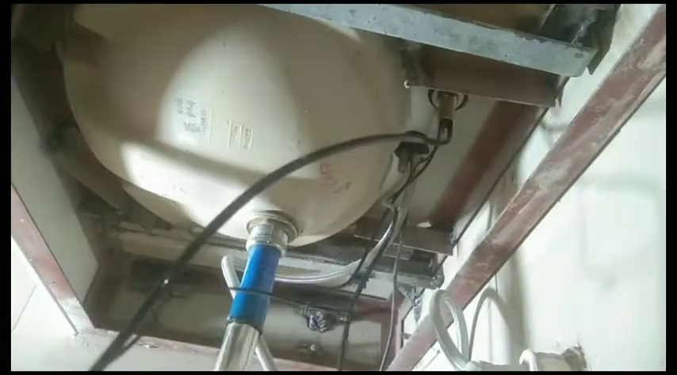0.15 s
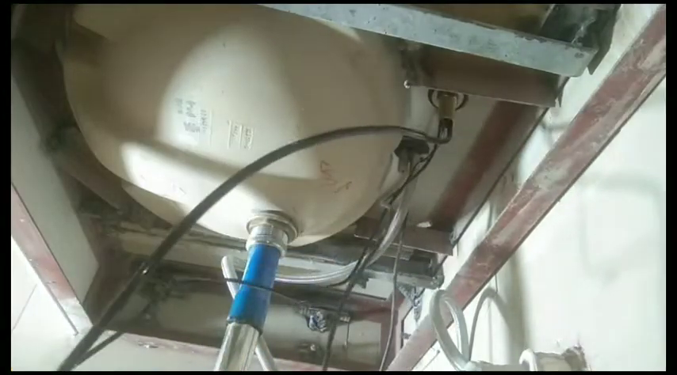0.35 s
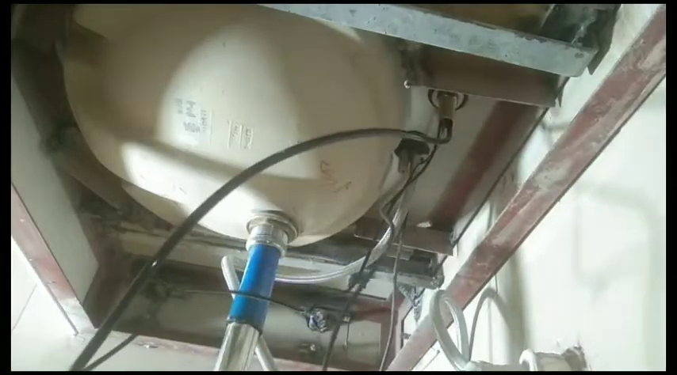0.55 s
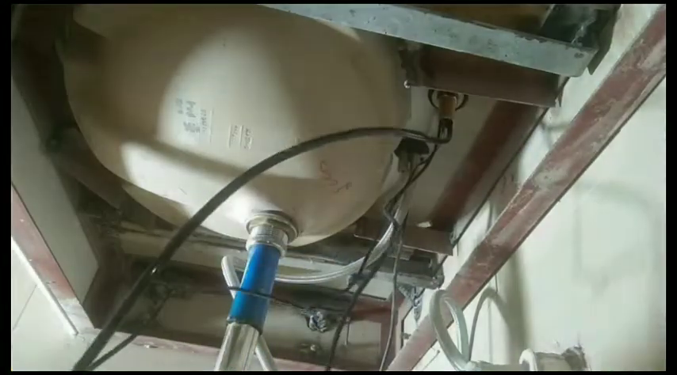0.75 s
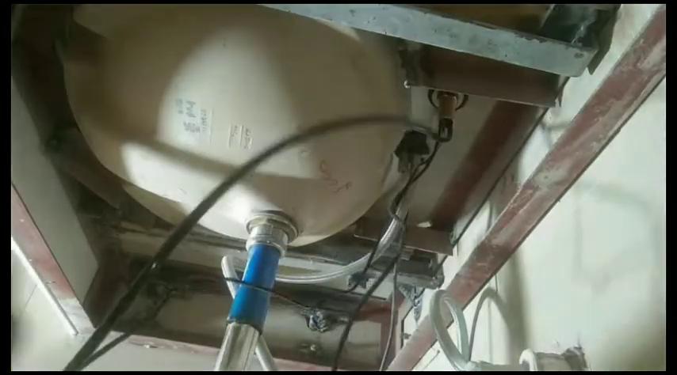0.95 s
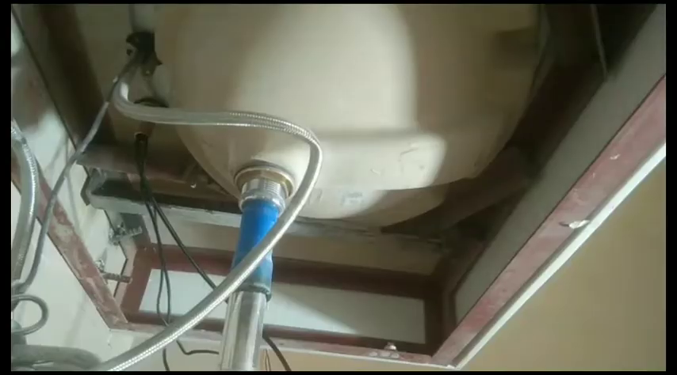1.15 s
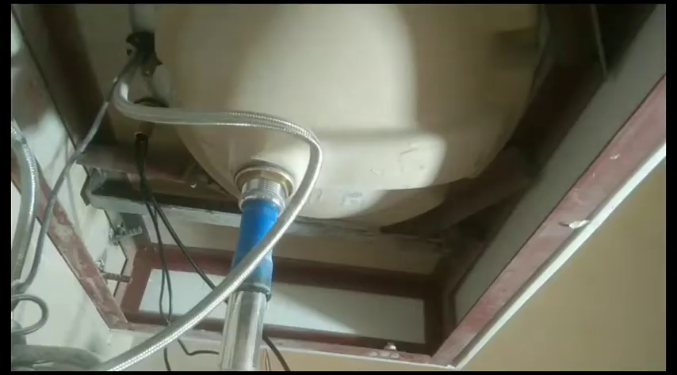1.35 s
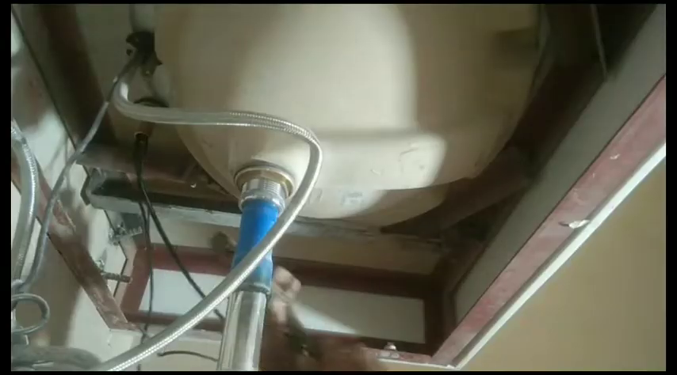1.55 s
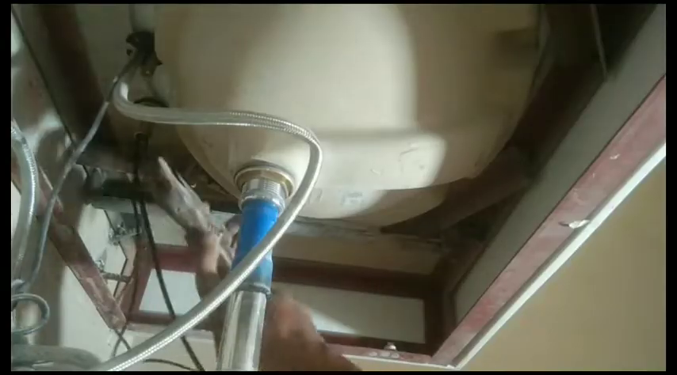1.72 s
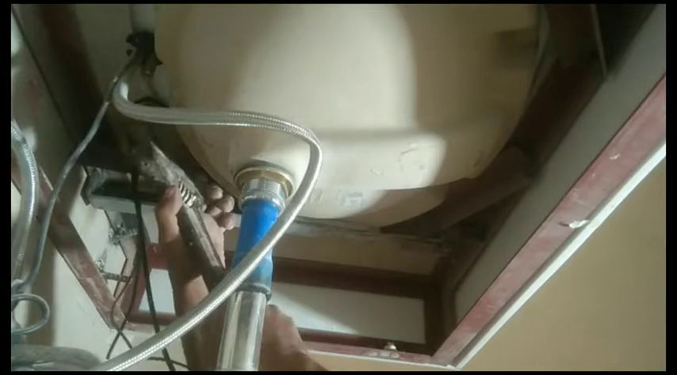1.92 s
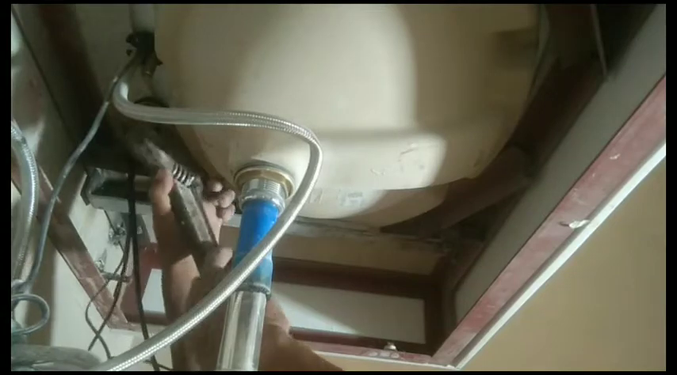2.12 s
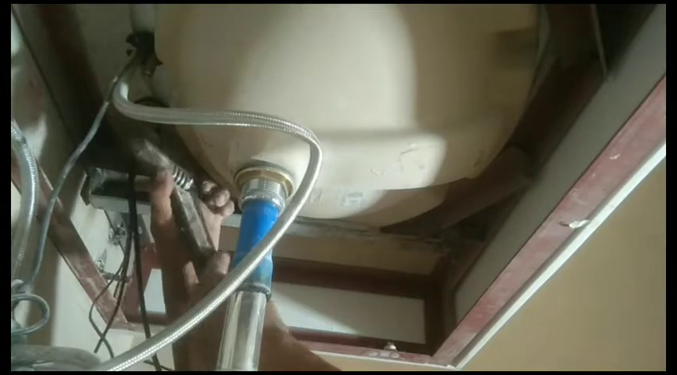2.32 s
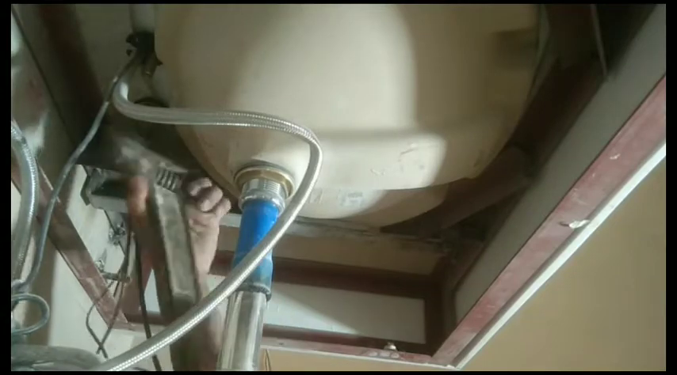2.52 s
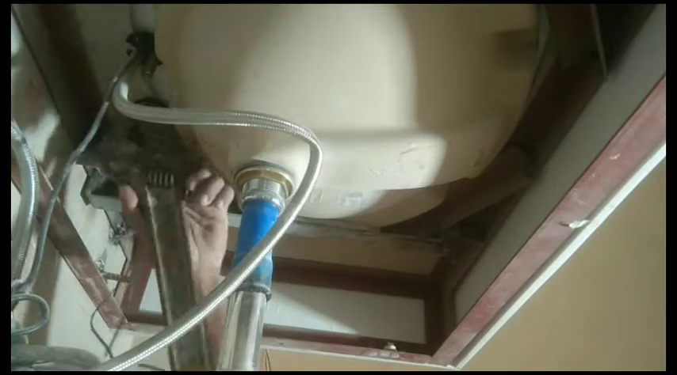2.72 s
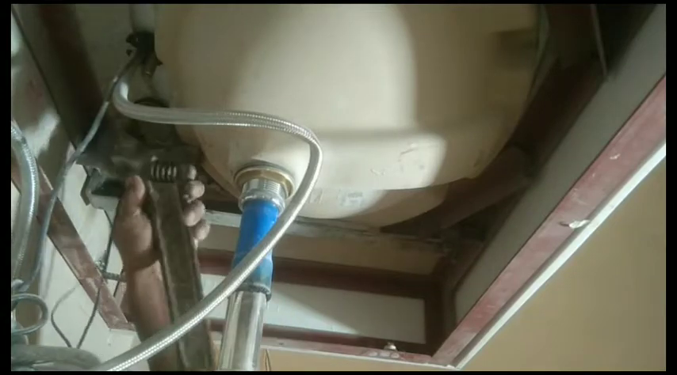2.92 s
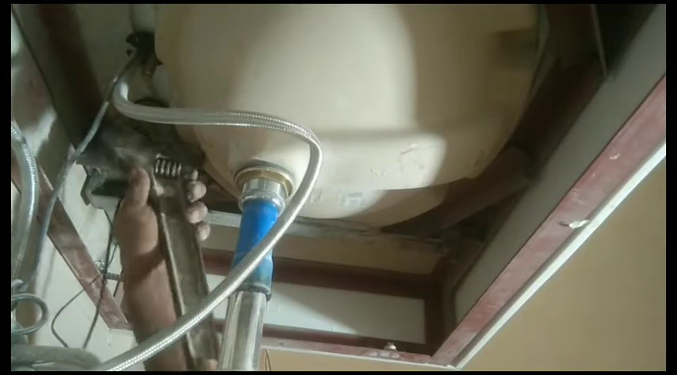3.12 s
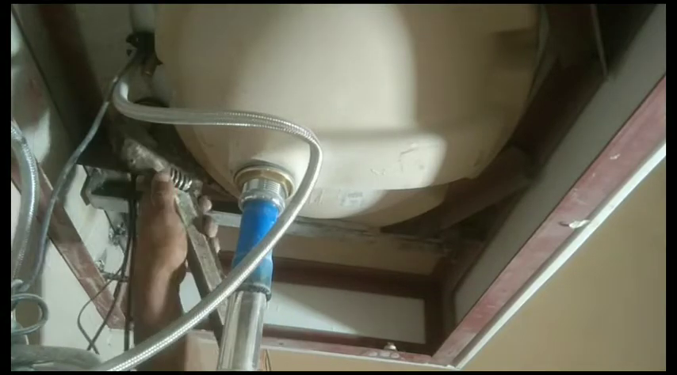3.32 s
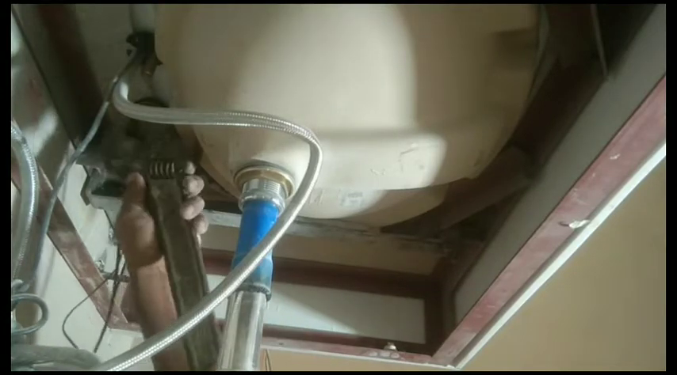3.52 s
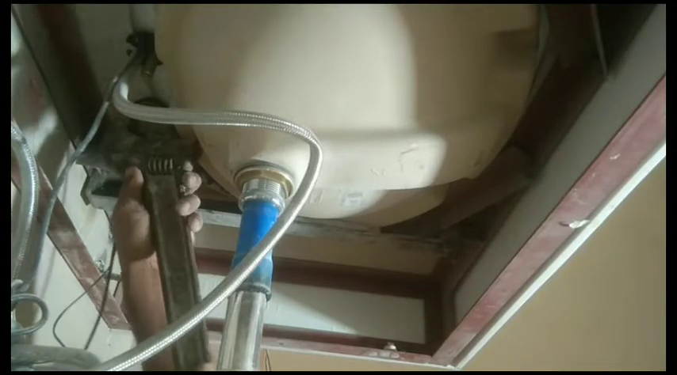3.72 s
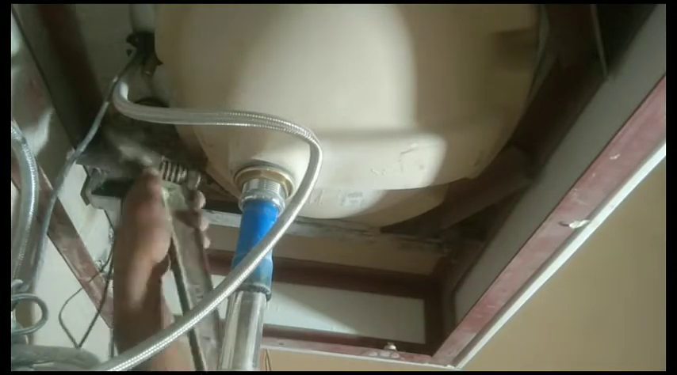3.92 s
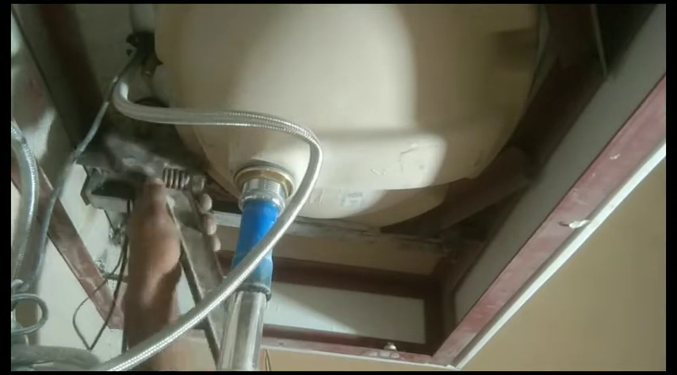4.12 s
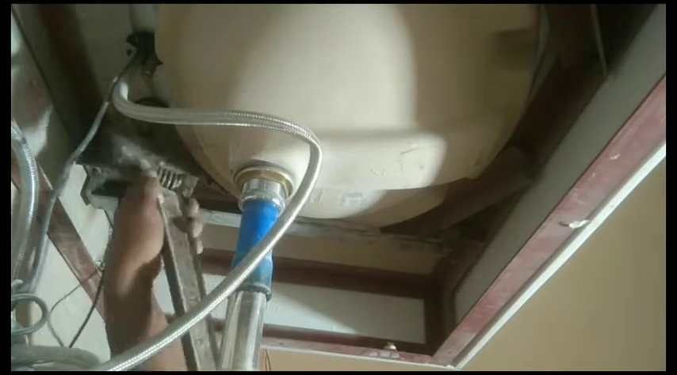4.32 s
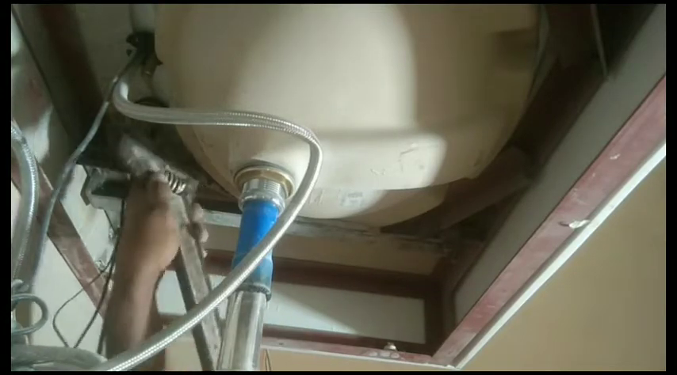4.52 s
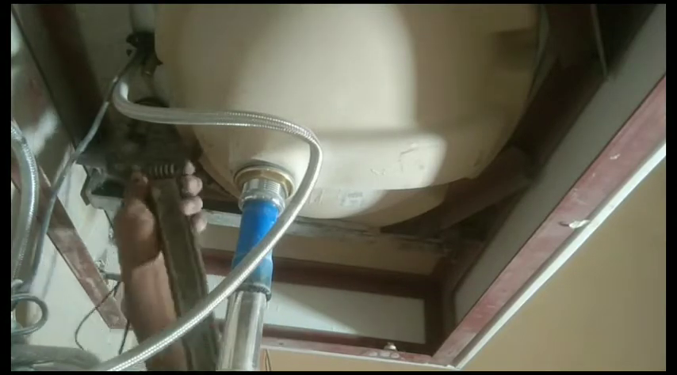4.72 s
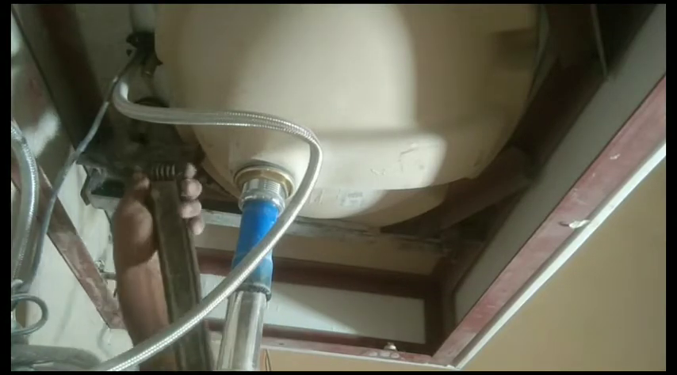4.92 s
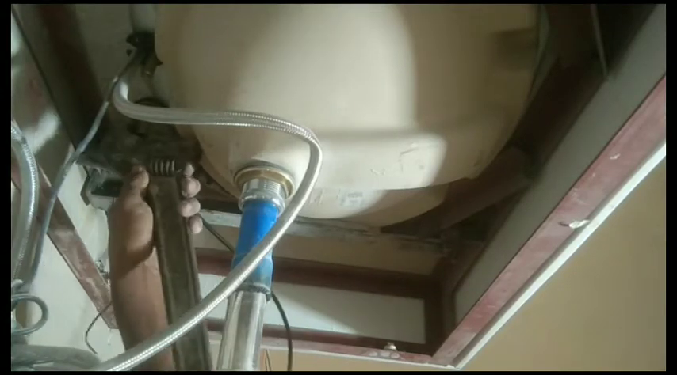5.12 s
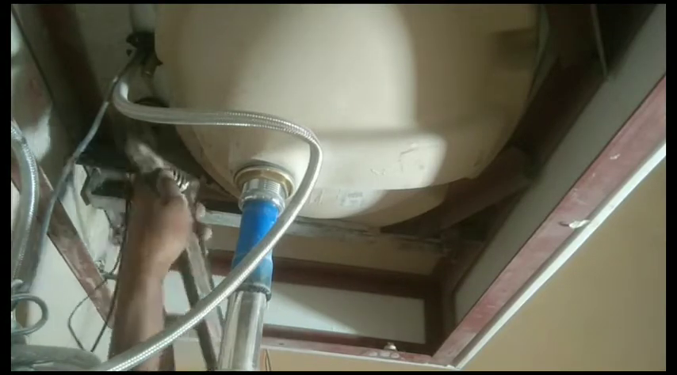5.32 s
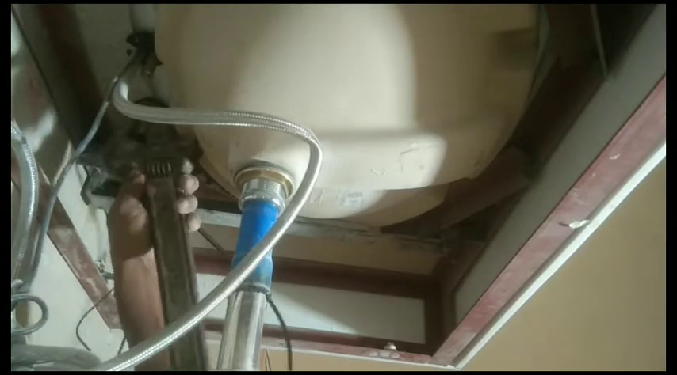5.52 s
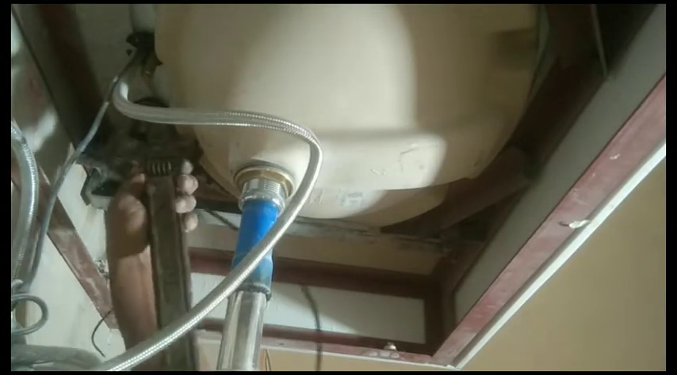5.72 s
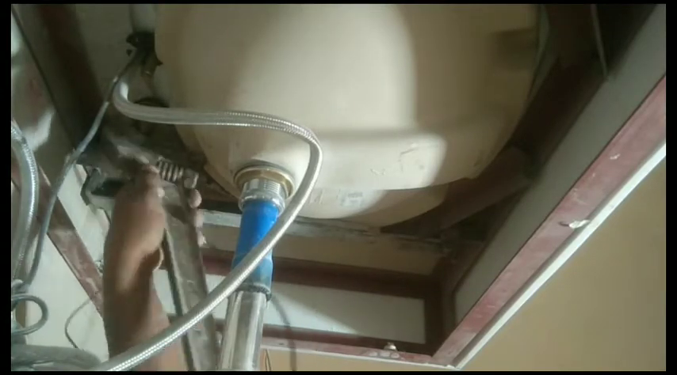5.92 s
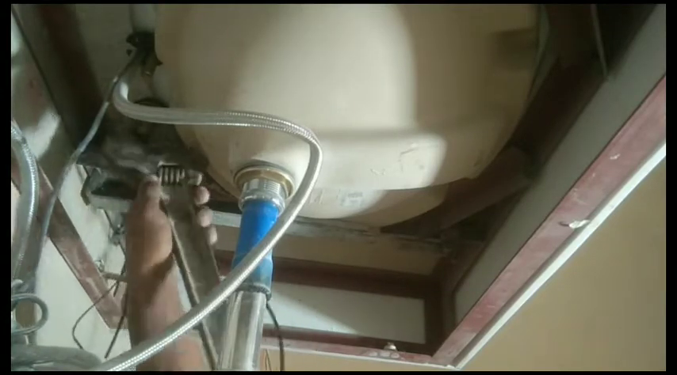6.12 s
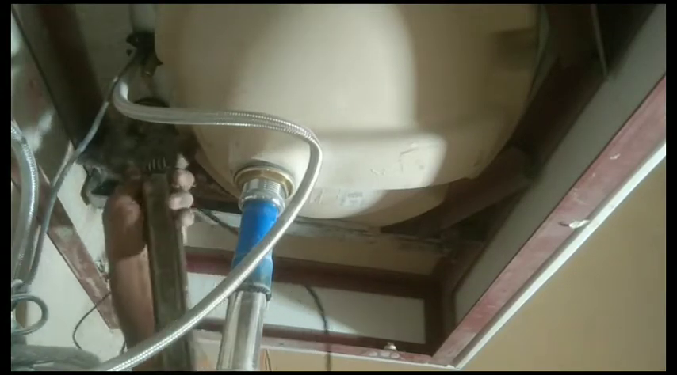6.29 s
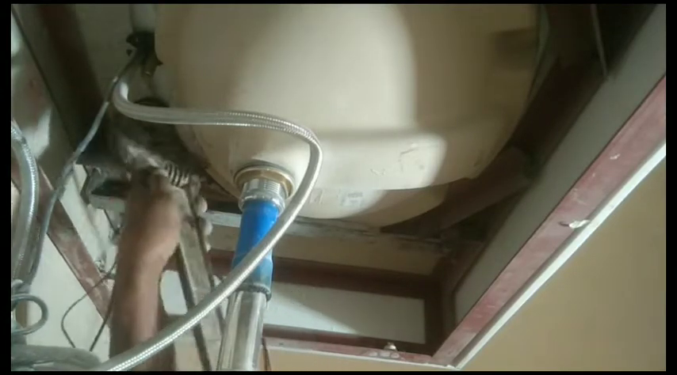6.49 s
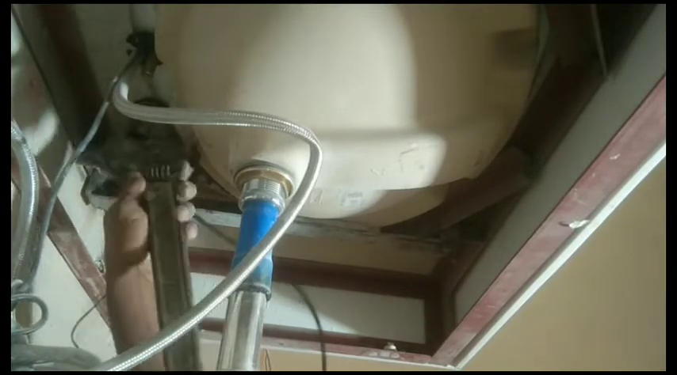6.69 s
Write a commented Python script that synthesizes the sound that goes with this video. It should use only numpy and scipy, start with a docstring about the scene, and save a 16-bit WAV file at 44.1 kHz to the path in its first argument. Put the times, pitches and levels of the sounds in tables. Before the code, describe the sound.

A stiff valve gives a brief, high, wavering squeal over soft rubbing of hands and hoses. After a tiny dropout, a wrench scrapes and clinks on a nut while pipes and a basin knock irregularly. Following the sharpest clink, the joint starts spraying with a loud, sputtering hiss and faint whistles as the knocks go on. The microphone is close, in a small enclosed space.

```python
"""A wrench works a nut under a sink, close up: steel scrapes and clinks, basin and pipes knock, and the
cabinet gives each hit a dull tail. Before that, a stiff valve stem squeals by stick-slip and the sound
drops out for a moment. Skin and hoses rub underneath as grainy friction noise. At last the loosened
joint sprays: a loud, sputtering hiss with faint whistles from the gap."""
import sys
import numpy as np
from scipy import signal
from scipy.io import wavfile
from scipy.ndimage import uniform_filter1d

SR = 44100
rng = np.random.default_rng(int(sys.argv[2]) if len(sys.argv) > 2 else 0)


def file_out(sig):
    """Save sig as 16-bit WAV at sys.argv[1]."""
    # one column per channel
    cols = np.atleast_2d(sig).T
    # limit, then scale
    lim = np.clip(cols, -1, 1)
    pcm = np.round(lim * 32767).astype(np.int16)
    wavfile.write(sys.argv[1], SR, pcm)


N = 297675


def undb(db):
    """Decibels to gain."""
    return 10 ** (np.asarray(db) / 20)


def unit(x):
    """Scale to rms 1."""
    return x / np.sqrt(np.mean(x ** 2))


def unit_peak(x):
    """Scale to peak 1."""
    return x / np.abs(x).max()


def bump(t, centre, half):
    """A bell-shaped swell of height 1."""
    return np.exp(-((t - centre) / half) ** 2)


def walk(rate):
    """Smooth random drift: levels held 1 / rate s and slewed twice; rms 1."""
    hold = int(SR / rate)
    steps = np.repeat(rng.standard_normal(N // hold + 1), hold)
    return unit(uniform_filter1d(uniform_filter1d(steps, hold), hold)[:N])


def add(out, x, s):
    """Mix x into out from time s."""
    i = int(s * SR)
    out[i:i + len(x)] += x[:N - i]


def gains(table):
    """One gain curve per level column of rows (time [s], level [dB], ...); silent outside them."""
    times, *columns = np.transpose(table)
    return (undb(np.interp(np.arange(N) / SR, times, db, -120, -120)) for db in columns)


def resonate(x, peaks):
    """Parallel resonances (centre [Hz], width [Hz], level [dB]) of alternating polarity."""
    return sum((-1) ** k * undb(db) * signal.lfilter(*signal.iirpeak(hz, hz / width, fs=SR), x)
               for k, (hz, width, db) in enumerate(peaks))


def friction(peaks, flicker_db, grain_db):
    """Dense uneven grains of noise through resonances that each flicker on their own."""
    grain = undb(grain_db * walk(120))
    return unit(sum(undb(flicker_db * walk(12)) * resonate(grain * rng.standard_normal(N), [peak])
                    for peak in peaks))


def ring(push, modes, detune, centre_hz=None, db_per_octave=11):
    """A push rings decaying modes, a little different each hit, favouring any near centre_hz; peak 1."""
    t = np.arange(len(push)) / SR
    body = 0
    for hz, db, t60 in modes:
        weight, shift = rng.standard_normal(2)
        gain = undb(db + 2 * weight - db_per_octave * abs(np.log2(hz / (centre_hz or hz))))
        body = body + gain * np.sin(2 * np.pi * hz * (1 + detune * shift) * t) * 1000 ** (-t / t60)
    return unit_peak(signal.fftconvolve(push, body)[:len(push)])


def in_cabinet(hit):
    """The cabinet adds a short dull tail, coloured differently for each hit."""
    t = np.arange(int(.25 * SR)) / SR
    echo = resonate(rng.standard_normal(len(t)), [(500, 1220, 0)]) * 1000 ** (-t / 0.19) * (t > .003)
    tail = signal.fftconvolve(hit, echo / np.sqrt(np.sum(echo ** 2)))[:len(hit)]
    return hit + undb(-14.5) * tail


def rubbing():
    """Sliding hands and hoses make a bed of hiss, rasp and rumble; single strokes swell out of it."""
    # the bed, joined late by the joint's first seep: (time [s], hiss [dB], rasp [dB], rumble [dB])
    bed = [(0, -53.5, -58.5, -41), (.3, -59.5, -67, -42.5), (.4, -50, -55, -36), (.63, -49.5, -61, -34.5),
           (.75, -57, -56, -36.5), (.85, -58, -56.5, -38.5), (1.05, -51.5, -50, -36.5),
           (1.13, -54.5, -56.5, -48.5), (1.9, -60, -55.5, -49), (2.3, -56.5, -55.5, -47.5),
           (2.6, -59, -55.5, -40), (3.3, -64, -57, -35.5), (3.55, -55.5, -52.5, -46), (3.85, -52, -61, -37),
           (3.98, -37, -56, -51), (4.3, -39.5, -40.5, -28.5), (4.65, -43.5, -63, -42.5),
           (4.8, -41, -36, -50)]
    # strokes of skin or sleeve: (middle [s], half length [s], hiss [dB], rasp against hiss [dB])
    strokes = [(0.086, 0.065, -48.5, -10), (0.583, 0.091, -57, -5), (1.053, 0.021, -50, -18),
               (1.185, 0.025, -50, -19), (1.374, 0.053, -49.5, 2.5), (1.54, 0.056, -62, 8),
               (1.683, 0.063, -49.5, 1), (2.338, 0.016, -62.5, 9), (2.668, 0.019, -68.5, 22),
               (2.75, 0.029, -62.5, 11), (3.349, 0.021, -29.5, -7), (3.46, 0.047, -39, -5),
               (3.624, 0.04, -47, -19), (3.776, 0.026, -45.5, 1)]
    # a hose drags over an edge: (start [s], release [s], level [dB])
    hose_drags = [(0.376, 0.631, -44.5), (0.867, 1.075, -43.5)]
    # colours of hiss, rasp, cabinet rumble and hose: (centre [Hz], width [Hz], level [dB])
    hiss_bands = [(4070, 880, -5.5), (4600, 630, -6.5), (5630, 1200, 0.5), (6360, 950, -1.5)]
    rasp_bands = [(945, 1200, 7.5), (1380, 130, 6), (2430, 1200, -1), (3000, 2900, 5.5)]
    rumble_bands = [(41, 31, -2), (138, 33, 2), (225, 45, -3.5), (410, 78, -11), (664, 95, -15.5)]
    hose_bands = [(330, 200, 4.5), (684, 240, -12.5), (1380, 270, 0.5), (2400, 280, 1.5), (2820, 680, 1.5),
                  (3320, 450, -7.5), (4950, 920, -1)]
    drag_rise_s, drag_fall_s = 0.011, 0.054
    t = np.arange(N) / SR
    hiss, rasp, rumble = gains(bed)
    for s, half, db, rasp_db in strokes:
        stroke = undb(db) * bump(t, s, half)
        hiss += stroke
        rasp += undb(rasp_db) * stroke
    drag = sum(undb(db) * np.interp(t, [on, on + drag_rise_s, off, off + drag_fall_s], [0, 1, 1, 0])
               for on, off, db in hose_drags)
    # a faint narrow hiss comes in abruptly at 2 s and slowly fades through the rest of the scene
    thin_hiss = undb(-58) * (t >= 2) * (7 - t) / 6.5
    return (thin_hiss * friction([(4352, 397, 0)], flicker_db=3.0, grain_db=1.3)
            + hiss * friction(hiss_bands, flicker_db=2.0, grain_db=1.9)
            + rasp * friction(rasp_bands, flicker_db=1.7, grain_db=3.0)
            + rumble * friction(rumble_bands, flicker_db=3.46, grain_db=0.24)
            + drag * friction(hose_bands, flicker_db=1.5, grain_db=1.5))


def valve_squeal():
    """Stick-slip drives two close high modes that beat unevenly and die away when the stem stops."""
    # the stem turns: (time [s], level [dB], upper tone against lower [dB])
    turn = [(0.044, -35, -13), (0.069, -17.5, -9), (0.201, -15, -4.5), (.27, -19, -7), (.39, -18, -1),
            (.56, -22.5, 1.5), (.65, -19.5, -6.5), (.69, -31, -1)]
    # it loses its grip and the tone dips: (middle [s], half length [s])
    slips = [(0.119, 0.012), (0.234, 0.013), (0.357, 0.0095), (0.441, 0.013), (0.583, 0.014)]
    # it grinds roughly: (middle [s], half length [s])
    grinds = [(0.087, 0.045), (0.353, .035)]
    pitch_hz, wander_hz, beat_hz, beat_wander_hz = 6362, 8, 40, 8
    flicker_db, halo_db, grind_db, fade_db_per_s = 2.6, -28.5, -19, 82.5
    t = np.arange(N) / SR
    times, db, upper_db = np.transpose(turn)
    level_db = np.interp(t, times, db, -120) - fade_db_per_s * np.maximum(t - times[-1], 0)
    upper_gain = undb(np.interp(t, times, upper_db))
    # the pair shifts so that the stronger tone lies nearer the pitch
    centre_hz = pitch_hz + wander_hz * walk(4.3) + (1 - upper_gain) * beat_hz / 2
    phase = np.cumsum(2 * np.pi * centre_hz / SR)
    beat = np.cumsum(np.pi * (beat_hz + beat_wander_hz * walk(25.23)) / SR)
    lower = undb(flicker_db * walk(40)) * np.sin(phase - beat)
    upper = undb(flicker_db * walk(40)) * upper_gain * np.sin(phase + beat)
    grip = 1 - .85 * sum(bump(t, s, half) for s, half in slips)
    roughness = undb(halo_db) + undb(grind_db) * sum(bump(t, s, half) for s, half in grinds)
    halo = roughness * unit(resonate(rng.standard_normal(N), [(pitch_hz, 500, 0)]))
    return undb(level_db) * ((lower + upper) * grip + halo)


def wrench_clinks():
    """Steel on steel: each short scrape swells, makes one firm contact and rings a part."""
    # contacts: (time [s], level [dB], rise [ms], part that rings)
    clinks = [(1.366, -35, 4, "wheel"), (1.514, -39, 4.7, "slider"), (2.175, -30.5, 12, "jaw"),
              (2.453, -12, 13.8, "jaw"), (2.86, -26.5, 2.1, "jaw"), (3.06, -29, 21, "jaw"),
              (3.28, -26, 10, "jaw"), (3.338, -11.5, 8, "jaw"), (3.797, -25, 6.5, "jaw"),
              (4.19, -28, 0.72, "nut"), (4.33, -36, .8, "nut"), (4.445, -28, 7.4, "jaw"),
              (4.492, -14.5, 6.8, "handle"), (4.501, -1.5, 3.8, "handle"), (4.57, -10.5, 16, "jaw")]
    # modes of jaw, handle, nut, adjusting wheel and loose slide: (pitch [Hz], level [dB], t60 [s])
    jaw = [(1416, 2, .06), (2290, 0, .045), (2785, -2, .09), (3074, -2, .06), (3190, -1, .06),
           (3430, -9, .12), (3920, 1, .05), (4200, -4, .07), (4344, 2, .07), (4657, -2, .06),
           (5190, 2, .07), (5540, -2, .05), (6250, 2, .08)]
    handle = [(2650, -1, .018), (3750, 1, .022), (5110, 7, .03), (6250, 5, .025), (5150, -11, .1)]
    nut = [(1303, -8, .06), (2390, 0, .24), (3470, -3, .22)]
    wheel = [(760, -2, .1), (1180, 0, .16), (2950, 0, .18), (3900, -5, .08), (4350, -5, .08)]
    slider = [(850, 1, .13), (1475, -3, .15), (2430, -6, .1), (3195, 0, .14), (4050, -6, .1)]
    modes = dict(jaw=jaw, handle=handle, nut=nut, wheel=wheel, slider=slider)
    ring_db = dict(jaw=-5, handle=2, nut=9, wheel=20, slider=20)  # against the scrape
    lead_s, fall_per_rise = .05, 0.68
    out = np.zeros(N)
    t = np.arange(int(.4 * SR)) / SR - lead_s
    contact = 7.1 * (np.abs(t) < .6 / SR)  # one sample at the height of the scrape
    for s, db, rise_ms, part in clinks:
        rise_s = rise_ms / 1000
        swell = np.where(t < 0, bump(t, 0, rise_s), np.exp(-np.abs(t) / (fall_per_rise * rise_s)))
        scrape = resonate(rng.standard_normal(len(t)), [(4270, 6700, 0.01)]) * swell
        ringing = undb(ring_db[part]) * ring(scrape + contact, modes[part], detune=0.0077)
        clink = unit_peak(unit_peak(scrape) + ringing)
        add(out, undb(db) * in_cabinet(clink), s - lead_s)
    return out


def basin_knocks():
    """Ragged blows a few ms long: the pipes knock, the bowl thuds, the fittings tap with a bright tick."""
    # blows: (time [s], level [dB], knock centre [Hz], thud against knock [dB], tap against knock [dB])
    blows = [(1.502, -32, 347, 0.5, -4), (1.971, -10.5, 245, -1, -17.5), (2.003, -20, 410, -17, -7.5),
             (2.068, -13.5, 620, -14, -12.5), (2.128, -14, 500, -29, -12), (2.174, -11.5, 330, -11, -5.5),
             (2.233, -16, 254, -9, -5.5), (2.452, -22, 298, -21, 1), (2.543, -21, 420, -9, -8.5),
             (2.586, -20.5, 250, 1.5, -7), (2.653, -31.5, 498, -23, 5), (2.706, -26.5, 570, -29, 3),
             (2.804, -18, 570, -8.5, -5), (2.858, -19, 417, -13, -18), (2.889, -13, 250, -6.5, -1),
             (3.019, -15, 398, -12, -4), (3.05, -17.5, 409, -1, 3.5), (3.078, -16, 250, -11, -0.5),
             (3.255, -3, 454, -25, -6.5), (3.281, -23.5, 350, 1, -15), (3.394, -28, 393, -6, 4),
             (3.431, -24, 630, -23, -28), (3.728, -18.5, 500, -17, 1), (3.763, -20, 396, -11, -8),
             (3.794, -15.5, 415, 0, 1.5), (3.866, -13.5, 430, -15, -16), (3.89, -24, 590, 3.5, 0),
             (3.964, -13.5, 440, -41, -9), (3.993, -24, 439, -0.5, 1.5), (4.189, -17, 600, -32, 1),
             (4.276, -23.5, 250, 3, -33), (4.317, -20, 589, -2.5, 2), (4.423, -20, 247, 1, -2),
             (4.496, -9, 247, -10, -10), (4.573, -10, 480, -15, -5), (4.585, -15, 607, -17, -15),
             (4.645, -22, 740, -14, 5.5), (4.868, -16, 567, 1, 3), (4.981, -9, 570, -10, -9),
             (5.109, -21, 605, -18, -4), (5.52, -11, 625, -11, -18), (5.651, -18, 453, 6.5, 2),
             (6.068, -8.5, 383, -18.5, -29), (6.145, -10.5, 581, -5, -6), (6.225, -16.5, 585, -1, -22.5),
             (6.348, -8.5, 250, -3.5, -6), (6.468, -31.5, 460, 13, -8), (6.575, -14, 380, -14, -11),
             (6.657, -17.5, 726, -4.5, -21)]
    # modes of pipes and frame, basin bowl and plastic fittings: (pitch [Hz], level [dB], t60 [s])
    pipe_modes = [(254, -2, .04), (360, 2, .035), (447, -1, .022), (534, -1, .02), (625, 3, .024),
                  (700, 1, .025), (810, -3, .025)]
    bowl_modes = [(137, -0.5, 0.14), (168, -5.5, 0.17), (243, -5, 0.11)]
    fitting_modes = [(900, -2, .007), (1310, -1, .012), (1620, -1, .006), (1950, -1, .006), (2300, 0, .008)]
    lead_s, scuffle_s, contact_at_s, contact_half_s = .005, .0035, .008, .0002
    bounce_s, bounce_db = .0045, -5
    out = np.zeros(N)
    t = np.arange(int(.3 * SR)) / SR
    click = np.arange(len(t)) == int(contact_at_s * SR)
    # the bowl is pushed in and springs back
    flex = np.gradient(np.maximum(t - contact_at_s / 2, 0) ** 2 * np.exp(-t / .0015))
    for s, db, hz, thud_db, tap_db in blows:
        scuffle = rng.standard_normal(len(t)) * t ** 2 * np.exp(-t / scuffle_s)
        force = np.abs(scuffle).max()
        # a firm contact and its rebound stand out of the scuffle
        rebound_at_s = contact_at_s + bounce_s * (1 + .2 * rng.standard_normal())
        rebound = undb(bounce_db) * bump(t, rebound_at_s, contact_half_s)
        contact = bump(t, contact_at_s, contact_half_s) - rebound
        push = scuffle + 12.0 * force * contact / (contact_half_s * SR)
        # loose parts rattle on around the knock's pitch
        band = [(hz, 450, 0)]
        rattle = resonate(resonate(rng.standard_normal(len(t)), band), band) * t * np.exp(-t / 0.011)
        knock = ring(push, pipe_modes, detune=.04, centre_hz=hz) + undb(-15) * unit_peak(rattle)
        tick = resonate(scuffle + 2 * force * click, [(4150, 1800, 0)])
        tap = ring(push, fitting_modes, detune=.06) + undb(-15.5) * unit_peak(tick)
        thud = ring(flex, bowl_modes, detune=0.059)
        hit = knock + undb(thud_db) * thud + undb(tap_db) * tap
        add(out, undb(db) * in_cabinet(hit), s - lead_s)
    return signal.sosfilt(signal.butter(2, 75, "high", fs=SR, output="sos"), out)


def flutter(cycles):
    """A tone shaken by quick noise into a narrow, breathy band."""
    phase = 2 * np.pi * cycles
    return (.8 + .8 * walk(150)) * np.sin(phase) + .8 * walk(150) * np.cos(phase)


def spray():
    """The loosened joint sputters in three shifting bands of hiss; a low rush follows the brightest."""
    # the jet's hiss: (time [s], bright [dB], hollow [dB], middle [dB])
    jet = [(4.62, -47.5, -60, -48), (4.8, -29.5, -48, -36), (4.83, -17.5, -28, -22),
           (4.89, -15, -23, -22.5), (4.98, -21.5, -30, -29), (5.052, -15, -23.5, -20),
           (5.1, -15, -29, -22.5), (5.16, -18.5, -28, -26.5), (5.28, -21.5, -24.5, -22),
           (5.35, -23, -37, -25), (5.42, -22.5, -25.5, -25.5), (5.5, -19, -32.5, -18),
           (5.62, -15, -25.5, -21), (5.78, -15.5, -26, -23), (5.89, -16.5, -27, -21),
           (5.96, -23, -31, -25.5), (6.49, -22.5, -35, -26), (6.57, -28.5, -39, -28),
           (6.66, -22.5, -36, -26), (6.75, -24.5, -40, -28.5)]
    # colours of the three hisses and the rush: (centre [Hz], width [Hz], level [dB])
    bright_bands = [(3610, 160, -2), (4620, 800, 1.5), (5780, 1200, -2), (6760, 1400, -5)]
    hollow_bands = [(832, 580, -4.5), (1242, 160, 0.5), (1470, 380, 0.5)]
    middle_bands = [(1830, 490, 5), (2290, 650, 6.5), (2900, 1200, 2)]
    rush_bands = [(116, 82, -0.5), (220, 120, -12), (398, 130, -8), (665, 330, -6)]
    full_jet_db, rush_db = -13.5, -23.5
    bright, hollow, middle = gains(jet)
    flowing = np.arange(N) / SR > jet[0][0]
    rush = flowing * undb(rush_db) * (bright / undb(full_jet_db)) ** 0.75
    return (rush * friction(rush_bands, flicker_db=1.3, grain_db=1.1)
            + hollow * friction(hollow_bands, flicker_db=1.5, grain_db=1.2)
            + middle * friction(middle_bands, flicker_db=1.2, grain_db=1.2)
            + bright * friction(bright_bands, flicker_db=.7, grain_db=1.8))


def leak_whistles():
    """The leaking gap whistles in short notes and one long one that wanders as the gap shifts."""
    # short notes: (start [s], loudest [s], end [s], pitch [Hz], level [dB])
    short_notes = [(4.81, 4.87, 5.04, 1850, -25), (5.0, 5.07, 5.14, 1860, -22),
                   (5.1, 5.29, 5.33, 1780, -28), (5.01, 5.1, 5.32, 1210, -28), (5.42, 5.47, 5.53, 430, -27),
                   (5.52, 5.56, 5.62, 1340, -29), (5.58, 5.72, 5.78, 1740, -24),
                   (5.69, 5.87, 5.95, 1220, -26)]
    # long note: (time [s], pitch [Hz], level [dB])
    long_note = [(5.38, 2380, -40), (5.46, 2370, -25), (5.55, 2380, -31), (5.63, 2390, -34),
                 (5.68, 2150, -27), (5.92, 2120, -28), (6.05, 2310, -29), (6.18, 2270, -28),
                 (6.22, 2330, -26), (6.37, 2350, -24), (6.41, 2265, -24), (6.5, 2255, -25),
                 (6.6, 2220, -40)]
    t = np.arange(N) / SR
    drift = np.cumsum(24 * walk(45)) / SR  # 24 Hz of waver shared by all notes
    short = sum(undb(db) * np.sqrt(np.interp(t, [start, top, end], [0, 1, 0])) * flutter(hz * t + drift)
                for start, top, end, hz, db in short_notes)
    times, hz, db = np.transpose(long_note)
    glide = np.cumsum(np.interp(t, times, hz)) / SR
    return short + undb(np.interp(t, times, db, -120, -120)) * flutter(glide + drift)


def scene():
    """Handwork, leak and valve, mixed in mono."""
    handwork = basin_knocks() + wrench_clinks() + rubbing()
    leak = .7 * leak_whistles() + spray()
    return (handwork + leak + valve_squeal())[None]


def record(dry):
    """The sound drops out and fades back in; a phone rounds the peaks, thins the bass and cuts the top."""
    # the phone's treble roll-off: (frequency [Hz], gain [dB])
    roll_off = [(6400, 0), (7000, -6), (7400, -22), (7750, -46), (7900, -80)]
    stop_s, resume_s, full_s = 1.057, 1.095, 1.149
    low_cut_hz, high_cut_hz, noise_floor_db = 70, 7780, -100
    t = np.arange(N) / SR
    gate = np.interp(t, [stop_s - .001, stop_s, resume_s, full_s], [1, 0, 0, 1]) ** 2
    sound = np.tanh(0.93 * dry * gate) / 0.81
    sound = signal.sosfilt(signal.butter(2, low_cut_hz, "high", fs=SR, output="sos"), sound)
    hz, db = np.transpose(roll_off)
    grid = np.linspace(0, SR / 2, 1025)
    dulling = signal.firwin2(301, grid, undb(np.interp(grid, hz, db)), fs=SR)
    sound = signal.fftconvolve(sound, dulling[None], "same")
    sound = sound + undb(noise_floor_db) * rng.standard_normal(dry.shape)
    return signal.sosfilt(signal.ellip(10, .2, 40, high_cut_hz, fs=SR, output="sos"), sound)


dry = scene()
out = record(dry)
file_out(out)
```